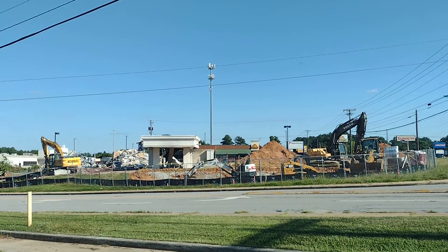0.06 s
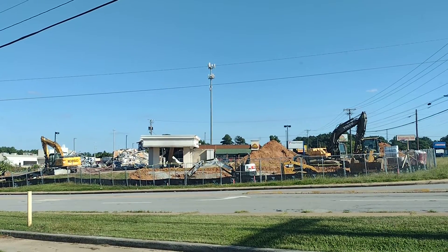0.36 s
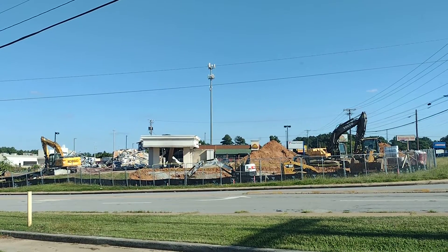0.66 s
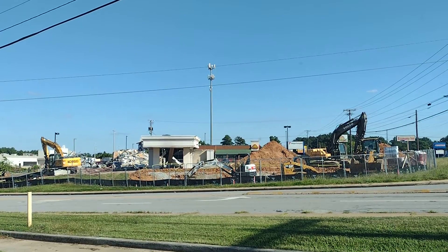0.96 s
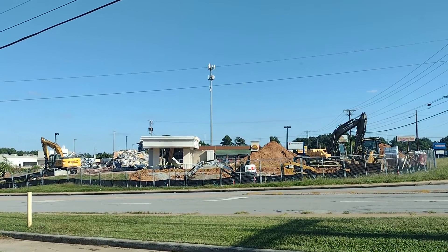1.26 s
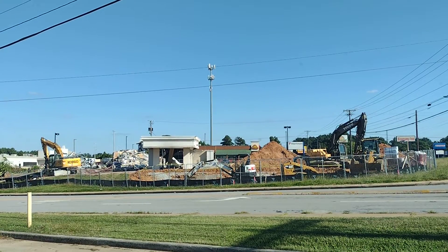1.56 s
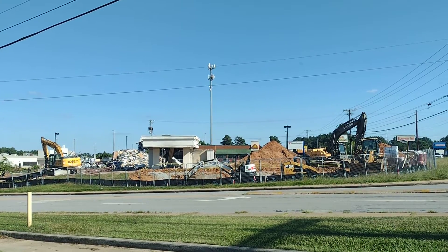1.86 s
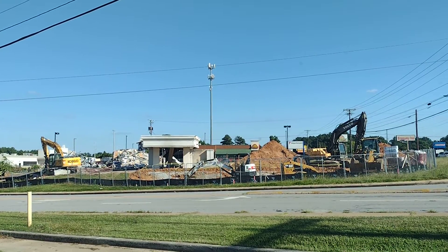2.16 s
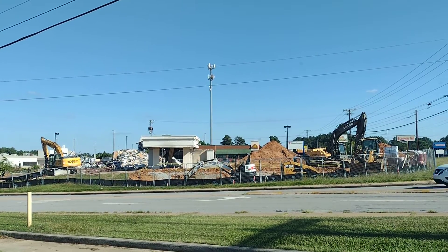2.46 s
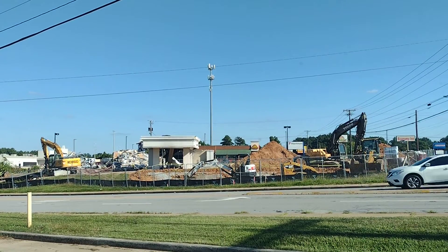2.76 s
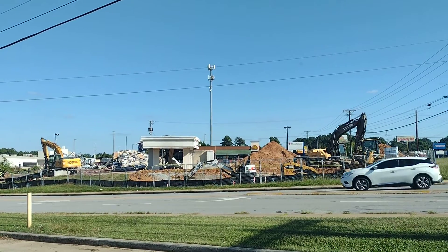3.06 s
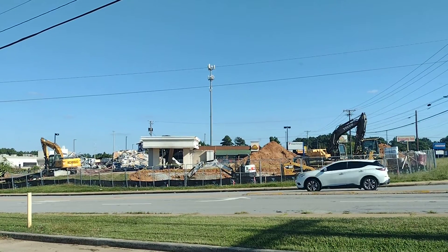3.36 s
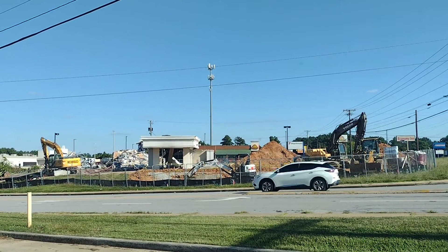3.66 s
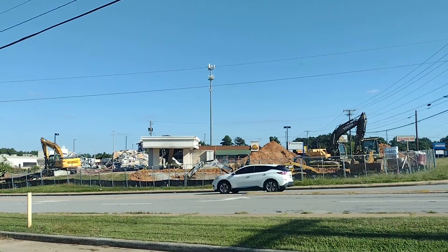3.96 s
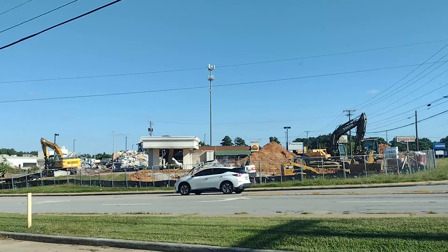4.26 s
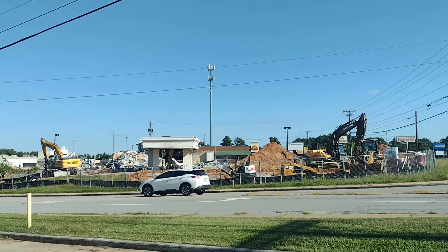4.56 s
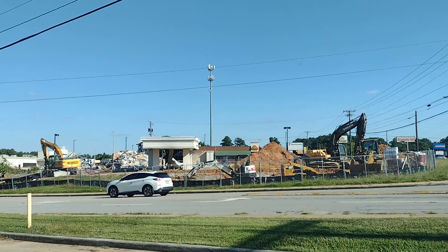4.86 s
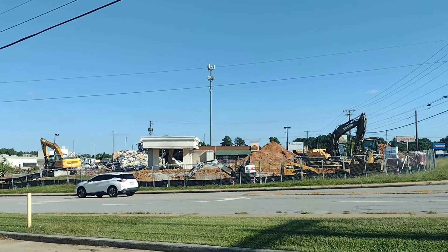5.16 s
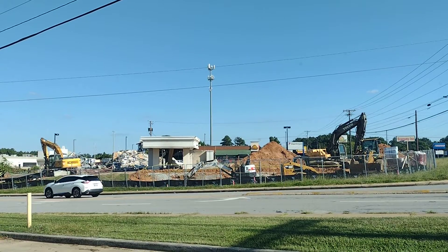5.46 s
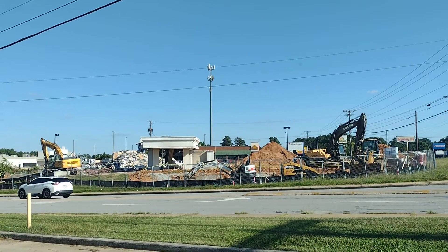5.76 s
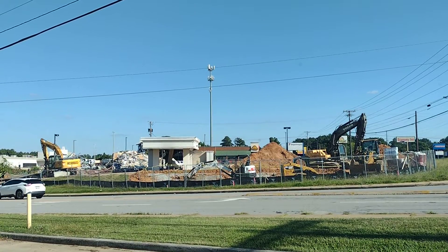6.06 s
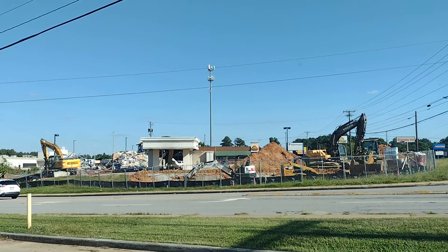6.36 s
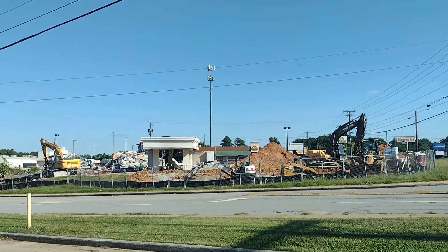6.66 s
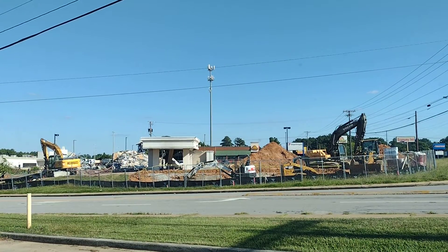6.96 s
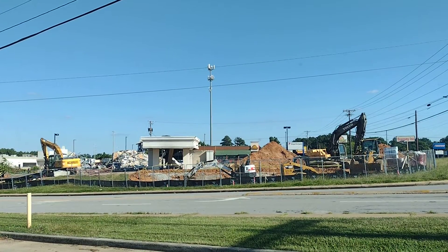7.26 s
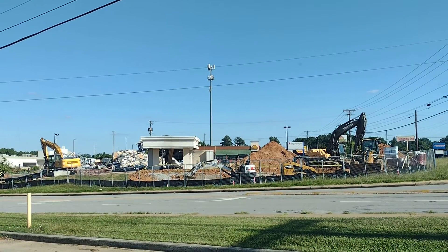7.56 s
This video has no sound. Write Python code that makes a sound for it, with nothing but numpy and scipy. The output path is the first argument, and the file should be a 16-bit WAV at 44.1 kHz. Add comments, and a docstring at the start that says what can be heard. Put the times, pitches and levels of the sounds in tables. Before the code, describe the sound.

A steady low rumble of road traffic and distant diggers, with an engine idling nearby and one car driving past.

```python
"""Traffic rumble across a road

Road traffic and distant diggers rumble, probably heard from a parked car. An engine idles close by
and a ventilation fan blows softly; one car drives past and others drone farther off. There is one
brief, distant scrape, and the treble flickers faintly. The sound reaches two microphone ports,
alike in the bass and only loosely related in the treble."""
import sys
import numpy as np
from scipy import signal
from scipy.fft import rfft, irfft
from scipy.io import wavfile
from scipy.ndimage import uniform_filter1d

SR = 44100
rng = np.random.default_rng(int(sys.argv[2]) if len(sys.argv) > 2 else 0)


def generate_wav(sig):
    """Save sig (samples, or channels by samples) to the path in sys.argv[1] as 16-bit PCM at SR."""
    pcm = np.round(np.clip(np.atleast_2d(sig).T, -1, 1) * 32767).astype(np.int16)
    wavfile.write(sys.argv[1], SR, pcm)


N = 340004
TIME, HZ = np.arange(N) / SR, np.fft.rfftfreq(N, 1 / SR)

# Tone and stereo image of the traffic and digger rumble, then of the tyre roar:
# (frequency [Hz], relative level [dB], left over right [dB], coherence [0-1], left phase lead [rad])
RUMBLE_SPECTRUM = [(18.0, -32.7, 0.0, 0.99, -0.01), (32.0, -24.1, -0.1, 0.99, -0.0),
                   (52.0, -19.5, 0.1, 0.987, 0.01), (64.0, -4.0, -0.1, 0.997, 0.0),
                   (100.0, 0.0, 0.0, 0.997, -0.04), (130.0, -0.8, -0.0, 0.996, -0.03),
                   (156.0, -9.2, 3.0, 0.976, -0.04), (171.0, -8.6, 2.5, 0.94, 0.02),
                   (183.0, -12.3, 0.4, 0.881, 0.01), (207.0, -8.1, -0.9, 0.934, -0.18),
                   (248.0, -14.3, -0.1, 0.887, -0.48), (310.0, -11.3, 2.3, 0.814, -0.45),
                   (340.0, -15.7, 3.8, 0.734, -1.27), (365.0, -21.4, 0.5, 0.322, -1.45)]
TYRE_SPECTRUM = [(365.0, -4.7, -4.1, 0.322, -1.45), (400.0, -1.1, -1.1, 0.77, -0.17),
                 (460.0, -5.4, -0.2, 0.641, -0.63), (520.0, -2.1, 1.3, 0.912, -0.85),
                 (590.0, -3.9, 2.6, 0.792, -1.67), (630.0, 0.0, -6.2, 0.789, -1.71),
                 (685.0, -4.2, -1.7, 0.772, -0.27), (745.0, -9.1, 5.6, 0.406, 0.38),
                 (805.0, -10.8, -3.2, 0.144, 3.34), (865.0, -6.1, -4.9, 0.647, 4.97),
                 (915.0, -10.6, 2.1, 0.397, 7.01), (960.0, -6.5, -0.1, 0.511, 7.77),
                 (1040.0, -15.4, 0.4, 0.179, 9.98)]
# The fan's rush of air, then its hiss: (frequency [Hz], relative level [dB], left over right [dB])
FAN_RUSH_SPECTRUM = [(1040.0, -1.0, -2.2), (1270.0, -3.2, -1.8), (1340.0, -0.2, -5.4), (1420.0, -2.0, -6.0),
                     (1530.0, -0.1, -4.4), (1640.0, -2.9, -4.9), (1830.0, -1.8, -5.6), (1960.0, -4.8, -5.4),
                     (2110.0, -2.6, -6.0), (2260.0, -10.6, -1.4), (2380.0, -11.9, 0.7), (2450.0, -8.3, 5.6),
                     (2600.0, -13.5, -0.5), (3250.0, -19.5, -2.6)]
FAN_HISS_SPECTRUM = [(3250.0, -4.0, -0.9), (3700.0, 0.0, -5.8), (4200.0, -2.0, -3.3), (4750.0, -6.8, -1.9),
                     (5500.0, -7.8, -2.6), (6700.0, -15.0, 2.0), (8500.0, -20.0, 0.0)]
# Brief swells and dips, of which each layer takes its share: (middle [s], length [s], change [dB])
TRAFFIC_SWELLS = [(0.17, 0.25, 2), (0.852, 0.31, -2.5), (1.197, 0.6, 2), (1.98, .4, 1.5), (3.33, .5, 1.8),
                  (4.16, 0.53, 1.5), (4.366, 0.22, -3.5), (4.686, 0.42, 2.5), (4.957, .22, -2),
                  (5.381, .35, -1.2), (5.77, .3, 2.5), (6.28, .2, -1.3), (6.8, 0.64, 1.7),
                  (7.57, 0.33, 1.5)]
# Exhaust notes of a car that passes and slows, one that pulls away and one that approaches:
# (loudest at [s], length [s], pitch there [Hz], glide [Hz/s], level there [dB])
CAR_PASSES = [(4.601, 4.3, 127.5, -6, -50.5), (6.699, 2.84, 100.4, 4.5, -48),
              (7.7, 2.96, 121.5, 0.5, -47.5)]
# Speed of the idling engine: (time [s], firing rate [Hz])
IDLE_SPEED = [(0.0, 40.25), (0.7, 40.24), (2.3, 39.48), (3.9, 39.8), (4.7, 40.74), (7.7, 40.45)]
# Its partials, the last from a belt-driven pulley: (multiple of the firing rate [x], level [dB])
IDLE_PARTIALS = [(1, -62.5), (2, -55), (3, -58), (7.69, -67.5)]
# Tone of the treble flicker: (frequency [Hz], relative level [dB])
FLICKER_SPECTRUM = [(5200, -6), (6200, -5), (6900, -5), (7500, 0), (8100, 0)]
# Spells of stronger flicker: (start [s], length [s], level before flares [dB])
STRONG_FLICKERS = [(0.0, 0.33, -90.5), (0.5, 0.27, -90), (1.53, .3, -92), (2.28, .4, -91), (2.75, .55, -90),
                   (4.58, .42, -91), (5.18, 0.76, -90.5), (6.92, .24, -91)]


def traffic(crossover_hz=160):
    """Exhaust rumble and tyre roar swell and dip briefly, and grow louder towards the end."""
    low_share = lowpass(crossover_hz)
    deep = steady(irfft(outdoor_spectra(RUMBLE_SPECTRUM) * np.sqrt(low_share), N))
    upper = steady(irfft(outdoor_spectra(RUMBLE_SPECTRUM) * np.sqrt(1 - low_share), N))
    tyres = steady(irfft(outdoor_spectra(TYRE_SPECTRUM), N))
    return (deep * traffic_fader(level_db=-43.9, swell_share=1.34, build_share=0.8, drift_db=0.5)
            + upper * traffic_fader(level_db=-51.0, swell_share=1, build_share=0.54, drift_db=0.22)
            + tyres * traffic_fader(level_db=-57.0, swell_share=0.6, build_share=1, drift_db=0.38))


def traffic_fader(level_db, swell_share, build_share, drift_db, build_from_s=4.05, build_db_per_s=0.31):
    """A layer's gain drifts, rides the swells and builds as more vehicles draw near."""
    swell_db = sum(db * arch(middle_s, length_s) for middle_s, length_s, db in TRAFFIC_SWELLS)
    build_db = build_db_per_s * np.maximum(TIME - build_from_s, 0)
    return gain_of(level_db + swell_share * swell_db + build_share * build_db + drift_db * wander(4))


def car_exhaust(loudest_s, length_s, hz, glide_hz_per_s, db):
    """A car's exhaust note fades in and out, gliding with its speed and direction."""
    note = hum(hz + glide_hz_per_s * (TIME - loudest_s), waver_db=3.5)
    return gain_of(db) * arch(loudest_s, length_s) * note


def idling_engine(jitter=0.0042):
    """Low partials follow the firing rate, which hunts a little."""
    firing_hz = np.interp(TIME, *np.transpose(IDLE_SPEED)) * (1 + jitter * wander(4.56))
    return sum(gain_of(db) * hum(order * firing_hz, waver_db=3.0) for order, db in IDLE_PARTIALS)


def fan(rush_db=-65.5, hiss_db=-81.5, flutter_db=0.59, hiss_flutter_db=0.5):
    """Air rushes unevenly through the vents, swelling a little with the traffic; a hiss throbs on top."""
    rush = vent_noise(FAN_RUSH_SPECTRUM)
    rush *= traffic_fader(rush_db, swell_share=0.45, build_share=0.74, drift_db=0.35)
    hiss = gain_of(hiss_db + hiss_flutter_db * wander(12)) * vent_noise(FAN_HISS_SPECTRUM)
    hiss *= np.array([fan_throb(depth=0.045), fan_throb(depth=0.14)])
    return (rush + hiss) * gain_of(flutter_db * wander(17))


def fan_throb(depth, turn_hz=38.3):
    """A tremolo with one main peak in each turn of the fan."""
    angle = 2 * np.pi * turn_hz * TIME
    return unit_rms(1 + depth * (np.cos(angle) + 0.49 * np.cos(2 * angle)))


def vent_noise(table, echo_gain=0.55, direct_gain=0.4, left_delay_s=0.00045):
    """Scattered air noise, plus a vent on the right that is heard directly and by reflection."""
    db, balance_db = eq_curves(table)
    direct = np.exp(-2j * np.pi * np.outer([left_delay_s, 0], HZ))
    paths = echo_gain * reflections() + direct_gain * direct
    air = white_pair() + white() * paths
    return steady(irfft(air * panned_gain(db, balance_db) * bandpass(table), N))


def reflections(first_s=0.008, decay_s=0.012):
    """Dense early echoes off nearby surfaces ripple the spectrum finely, differently at each port."""
    decay = np.exp(-np.minimum(TIME / decay_s, 20))
    echoes = rng.standard_normal((2, N)) * (TIME > first_s) * decay
    return rfft(echoes / np.linalg.norm(echoes, axis=1, keepdims=True))


def digger(hz=278, drift=0.003, level_db=-68, load_at_s=4.15, load_rise_s=0.3, load_db=3.5):
    """A distant digger's engine holds one governed note, louder once it takes up load."""
    load = np.clip((TIME - load_at_s) / load_rise_s, 0, 1)
    note = hum(hz * (1 + drift * wander(1.38)), waver_db=1.5)
    return gain_of(level_db + load_db * load) * note


def scrape(centre_hz=2280, width_octaves=0.61, level_db=-71.5):
    """A brief, distant scrape on the site: a soft band of noise rises and fades."""
    octaves = np.log2((HZ + 1) / centre_hz)
    bell = np.exp(-0.5 * (octaves / width_octaves) ** 2)
    noise = unit_rms(irfft(white_pair() * bell, N))
    return gain_of(level_db) * arch(middle_s=0.14, length_s=0.28) * noise


def treble_flicker(rest_db=-98.5, flare_hz=18, depth_db=4.5, fade_s=0.04):
    """Faint flares of sizzle come at random, stronger in spells, and throb with the fan."""
    level_db = rest_db
    for start_s, length_s, db in STRONG_FLICKERS:
        inside_s = np.minimum(TIME - start_s, start_s + length_s - TIME)
        level_db += (db - rest_db) * np.clip(inside_s / fade_s + 0.5, 0, 1)
    flare_db = depth_db * np.minimum(wander(flare_hz), 1.2)  # capped so no flare sticks out
    eq = gain_of(eq_curves(FLICKER_SPECTRUM)[0]) * bandpass(FLICKER_SPECTRUM)
    sizzle = steady(irfft(white_pair() * eq, N))
    return gain_of(level_db + flare_db) * sizzle * fan_throb(depth=0.15)


def microphone_hiss(level_db=-80.0, tilt_db=-1.0):
    """The noise floor: each microphone's own even hiss, a little duller towards the top."""
    shelf_db = eq_curves([(8000, 0.0032), (16000, tilt_db)])[0]
    return irfft(white_pair() * gain_of(level_db + shelf_db), N)


def outdoor_spectra(table):
    """Spectra of a noise at the two ports, partly shared and shifted in phase."""
    db, balance_db, coherence, lead_rad = eq_curves(table)
    left = white()
    right = (coherence * left + np.sqrt(1 - coherence ** 2) * white()) * np.exp(-1j * lead_rad)
    return np.array([left, right]) * panned_gain(db, balance_db) * bandpass(table)


def hum(hz, waver_db):
    """One engine partial: a sine that wavers in level."""
    cycles = np.cumsum(hz) / SR + rng.random()
    return np.sqrt(2) * np.sin(2 * np.pi * cycles) * gain_of(waver_db * wander(10))


def arch(middle_s, length_s):
    """A smooth fade from 0 to 1 and back."""
    return np.cos(np.pi * np.clip((TIME - middle_s) / length_s, -0.5, 0.5)) ** 2


def wander(rate_hz):
    """Slow random modulation at unit rms."""
    return unit_rms(irfft(white() * lowpass(rate_hz, order=4), N))


def steady(pair, window=9000):
    """Rides a stereo noise so its centre holds unit level, keeping the fast flutter."""
    centre_power = uniform_filter1d(pair.mean(0) ** 2, window)
    return pair / np.sqrt(uniform_filter1d(centre_power, window // 2))


def eq_curves(table):
    """Each column of a frequency table, drawn across all bins on a log scale."""
    hz, *columns = np.transpose(table)
    return [np.interp(np.log(HZ + 1), np.log(hz + 1), column) for column in columns]


def lowpass(edge_hz, order=40):
    """A roll-off from 1 to 0, halfway down at the edge."""
    return 1 / (1 + (HZ / edge_hz) ** order)


def bandpass(table):
    """Gain that confines a sound to the range of its table."""
    return np.sqrt(lowpass(table[-1][0]) * (1 - lowpass(table[0][0])))


def white():
    """Spectrum of white noise."""
    return rfft(rng.standard_normal(N))


def white_pair():
    """Unrelated white spectra, left and right."""
    return np.array([white(), white()])


def panned_gain(db, balance_db):
    """Left and right gains; a positive balance leans left."""
    return gain_of([db + balance_db / 2, db - balance_db / 2])


def gain_of(db):
    """Decibels to amplitude."""
    return 10 ** (np.asarray(db) / 20)


def unit_rms(x):
    """Scales to unit rms."""
    return x / np.sqrt(np.mean(x ** 2) + 1e-20)


def scene():
    """The mix: engine notes sit in the centre of the stereo noise beds."""
    engines = idling_engine() + digger() + sum(car_exhaust(*car) for car in CAR_PASSES)
    return traffic() + engines + fan() + treble_flicker() + microphone_hiss() + scrape()


def record(dry):
    """A steep high cut takes off the very top."""
    high_cut = signal.firwin(2047, cutoff=15700, window=("kaiser", 9), fs=SR)
    return signal.oaconvolve(dry, high_cut[None], "same")


dry = scene()
out = record(dry)
generate_wav(out)
```